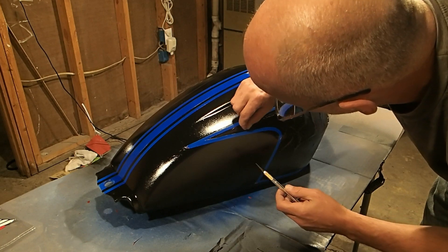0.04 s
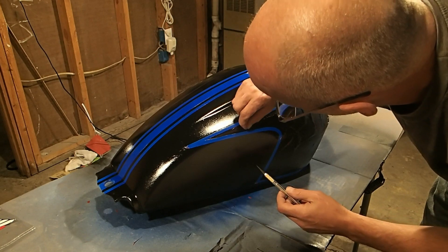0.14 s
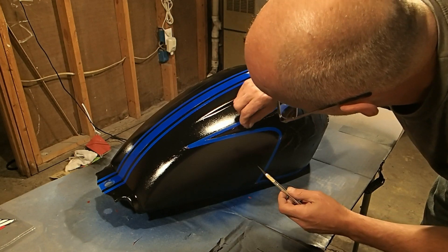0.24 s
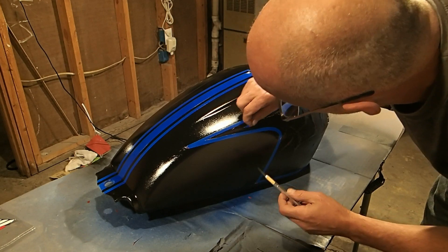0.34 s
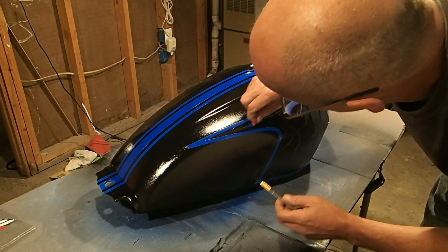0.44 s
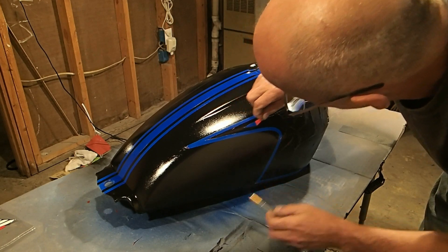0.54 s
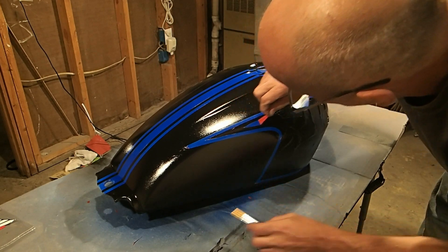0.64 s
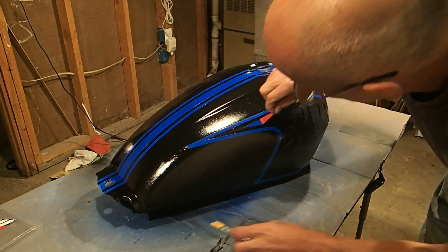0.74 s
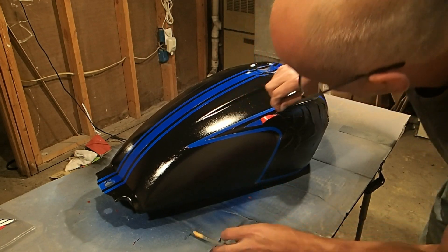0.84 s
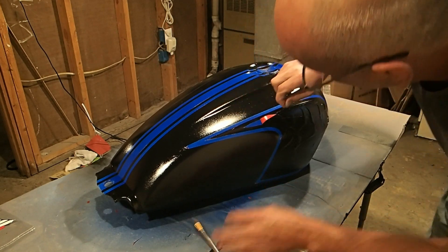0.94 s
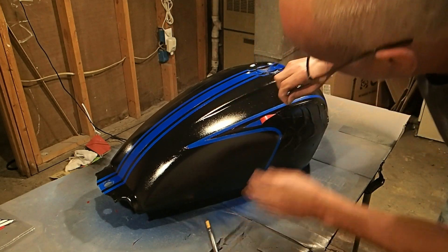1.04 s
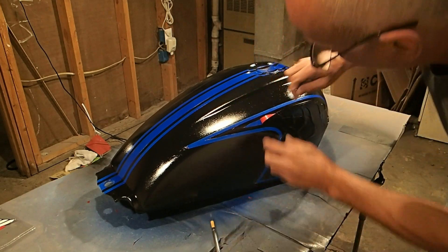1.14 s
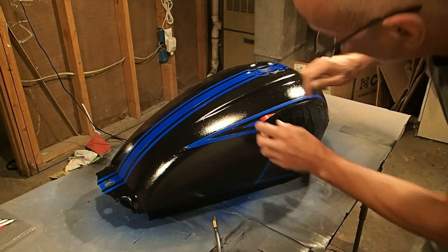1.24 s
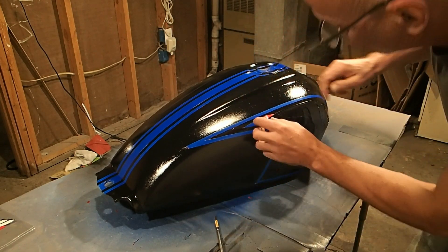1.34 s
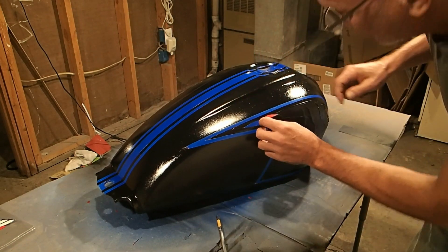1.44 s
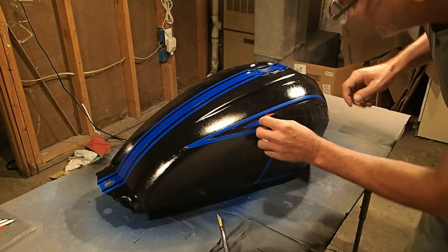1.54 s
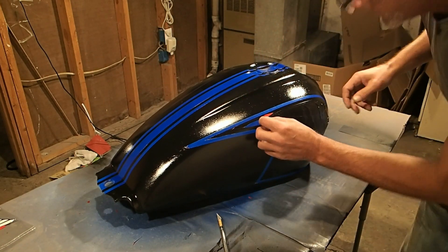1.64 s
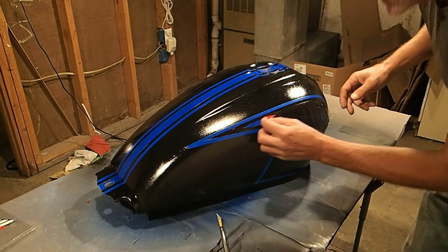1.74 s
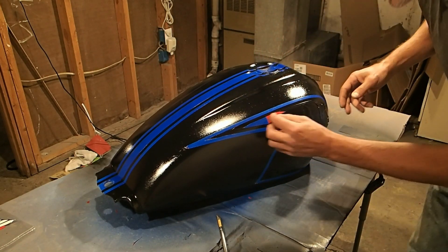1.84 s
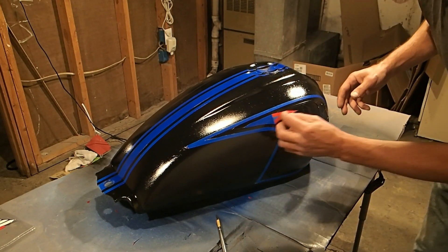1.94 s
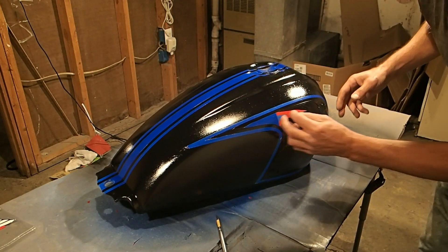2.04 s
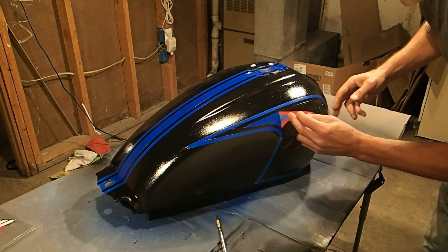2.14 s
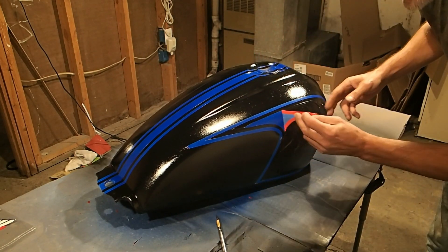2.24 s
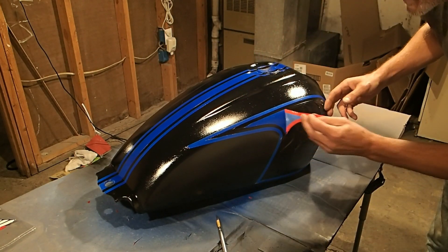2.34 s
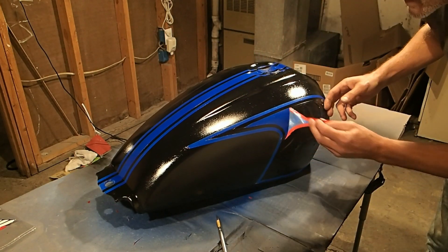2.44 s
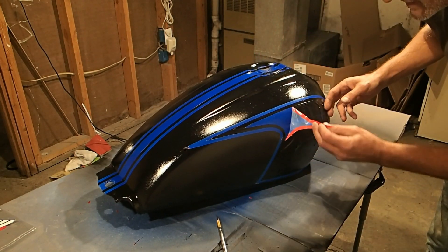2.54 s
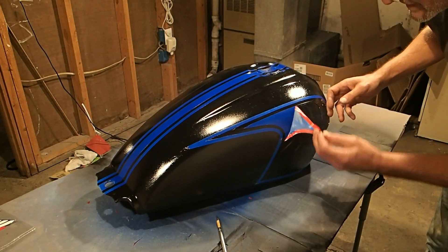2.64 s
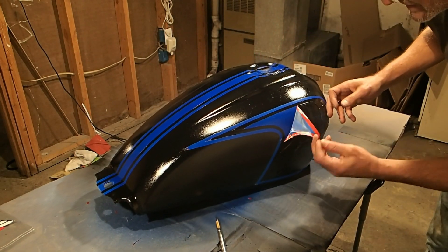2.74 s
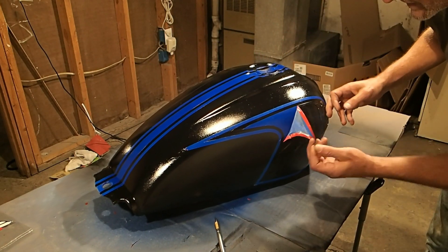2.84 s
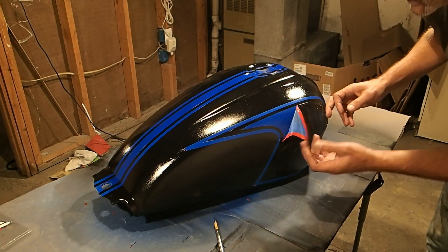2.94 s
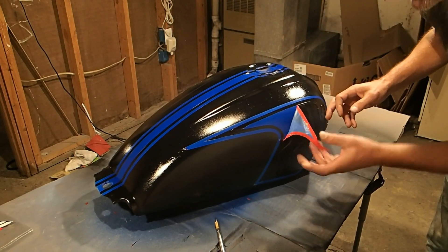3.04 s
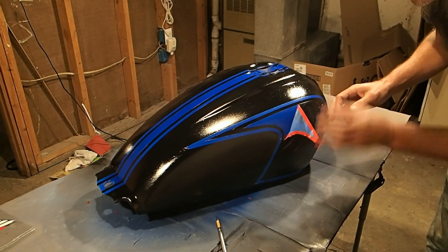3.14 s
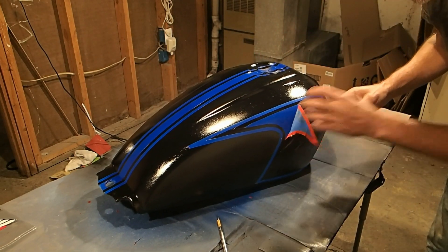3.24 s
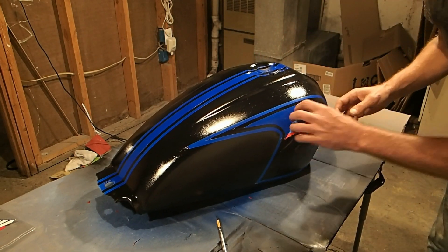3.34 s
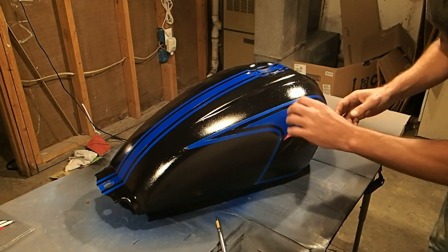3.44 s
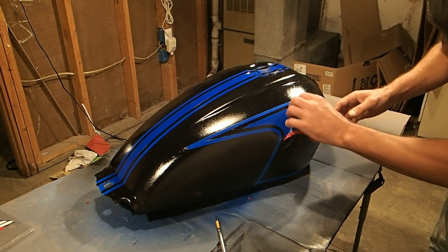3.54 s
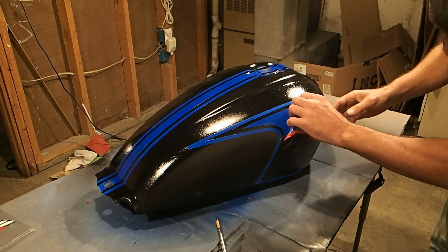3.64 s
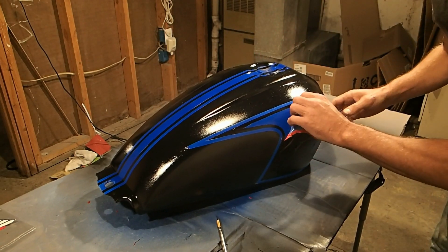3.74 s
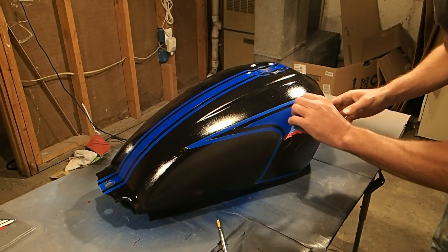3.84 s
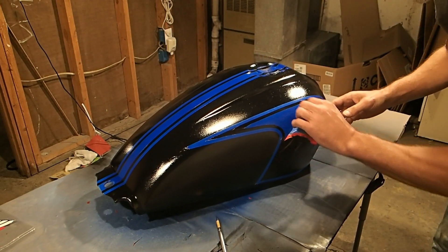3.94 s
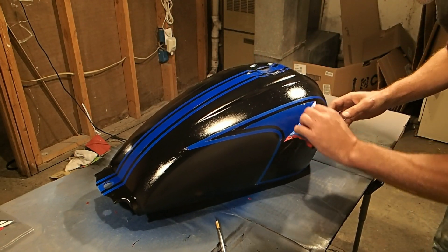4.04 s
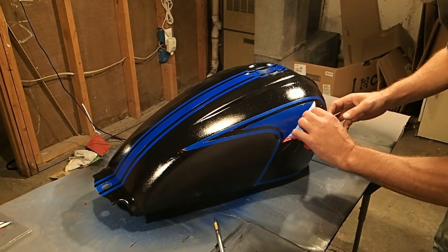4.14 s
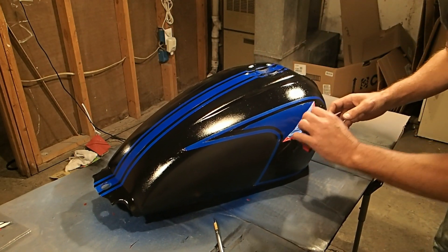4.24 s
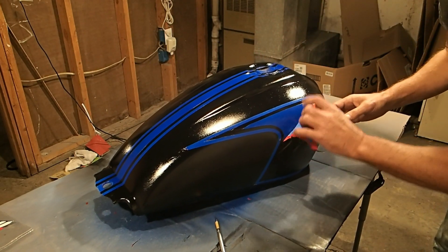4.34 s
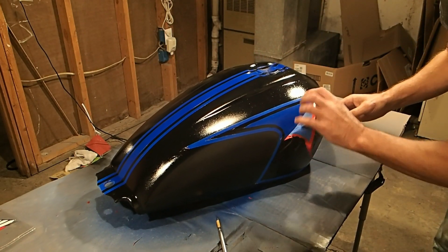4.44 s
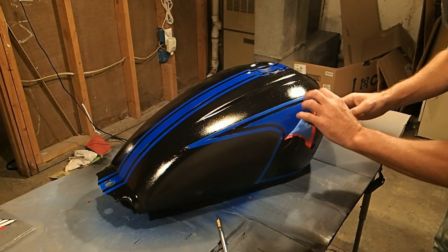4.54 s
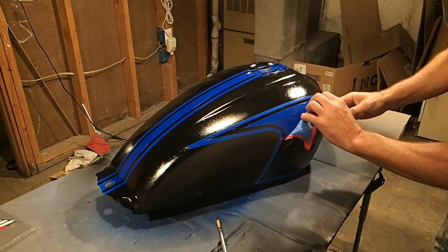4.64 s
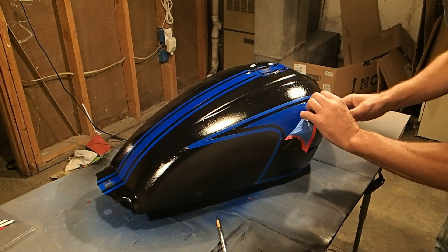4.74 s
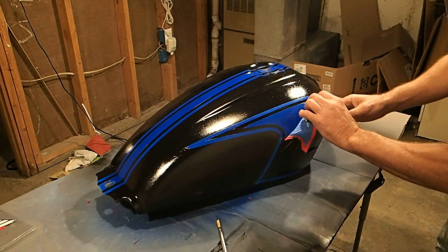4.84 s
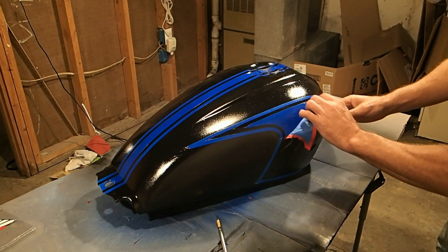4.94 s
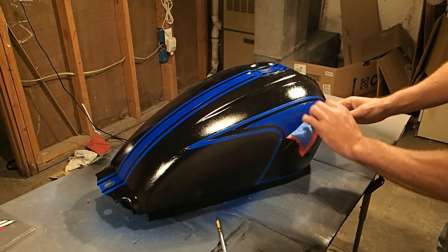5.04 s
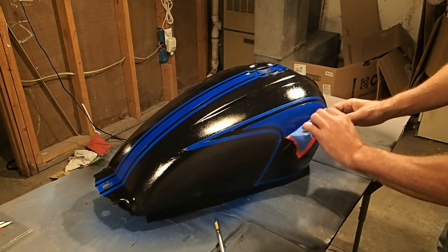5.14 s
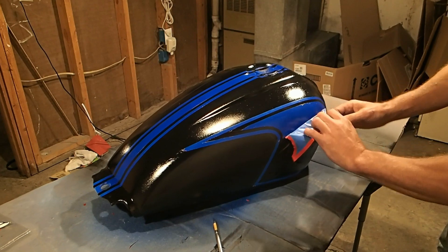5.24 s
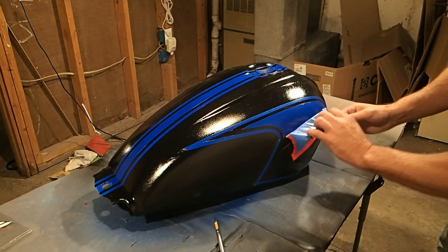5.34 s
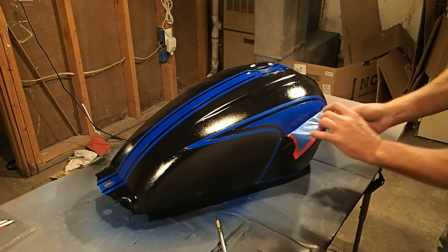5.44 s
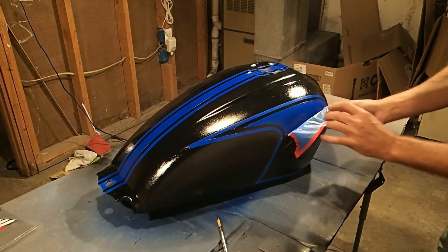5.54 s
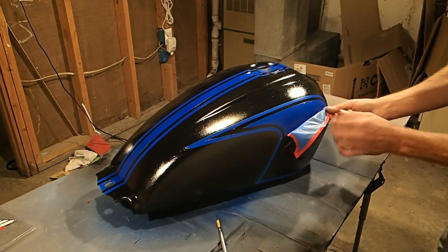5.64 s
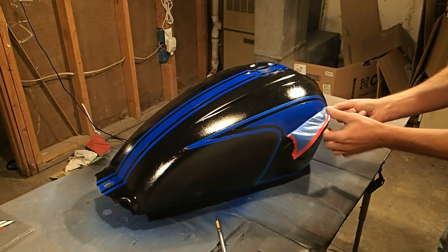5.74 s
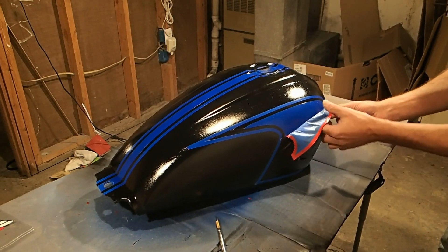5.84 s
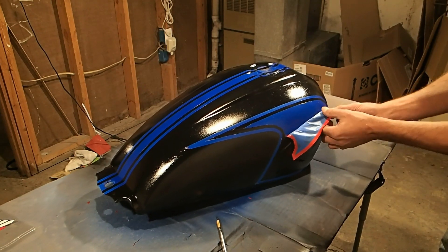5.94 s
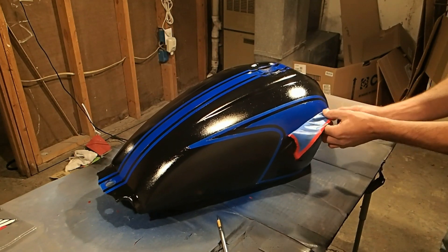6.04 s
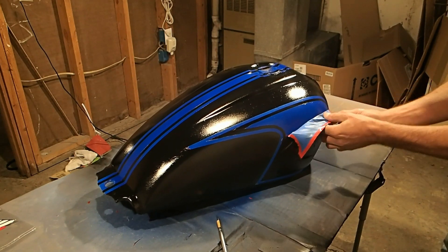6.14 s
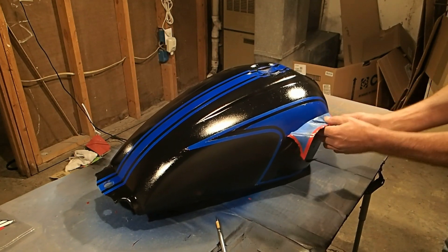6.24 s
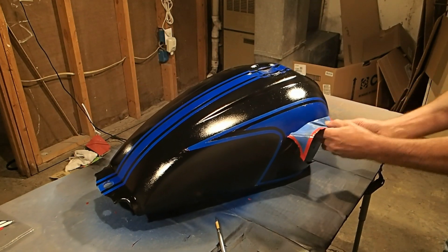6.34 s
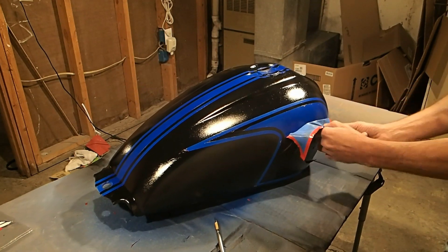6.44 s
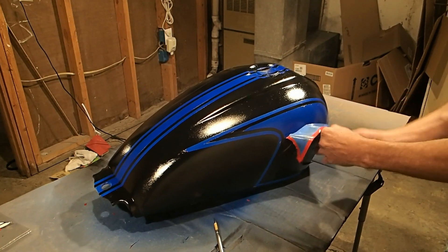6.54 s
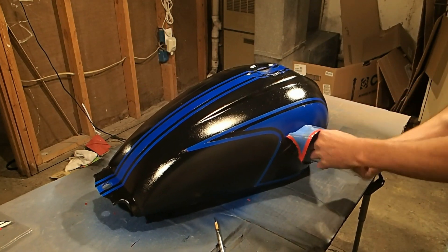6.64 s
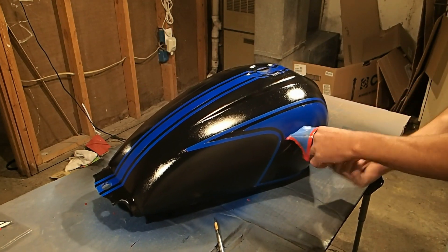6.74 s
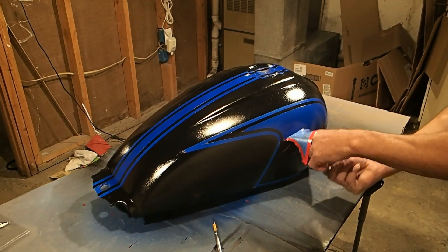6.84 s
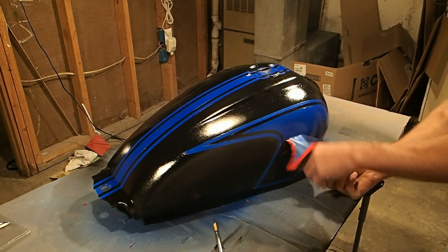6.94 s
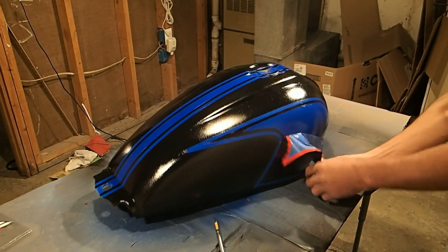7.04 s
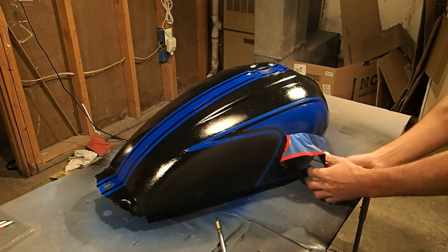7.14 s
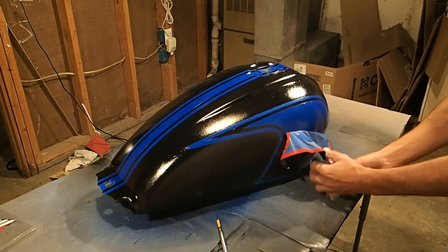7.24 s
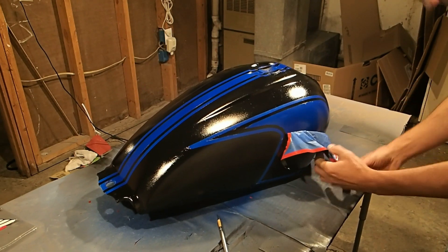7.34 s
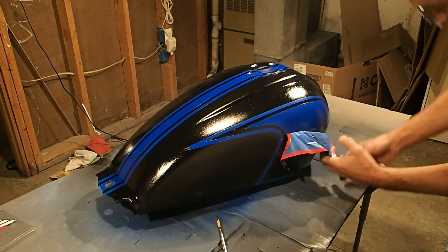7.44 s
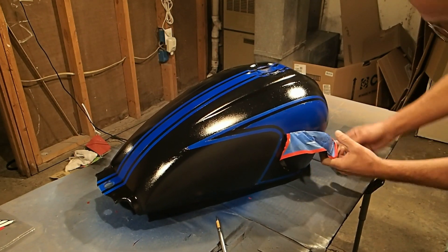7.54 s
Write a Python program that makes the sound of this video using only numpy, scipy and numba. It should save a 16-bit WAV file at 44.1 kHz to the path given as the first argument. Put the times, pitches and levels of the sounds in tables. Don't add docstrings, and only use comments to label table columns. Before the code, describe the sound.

Close, bright tape peeling in a small workshop: sticky crackle, hard snaps, two long rips, soft hand bumps, low hum behind.

```python
import sys
import numpy as np
from scipy import signal
from scipy.fft import rfft, irfft
from scipy.io import wavfile
from scipy.ndimage import uniform_filter1d
from numba import njit

SR = 44100
rng = np.random.default_rng(int(sys.argv[2]) if len(sys.argv) > 2 else 0)


def digitize_waveform(pressure):
    field = np.atleast_2d(pressure).T
    bounded = np.clip(field, -1, 1)
    quanta = np.round(bounded * 32767).astype(np.int16)
    wavfile.write(sys.argv[1], SR, quanta)


def boost(x):
    u = np.asarray(x, float) / 20
    return 10 ** u


N = 335477
TIME = np.arange(N) / SR
GAIN_TOP_DB, GAIN_RATIO = -25, 2.0


def unit(x):
    return x / np.sqrt(np.mean(x ** 2))


def colour(x, points):
    hz, db = np.transpose(points)
    log_hz = np.log(np.fft.rfftfreq(4096, 1 / SR) + 1)
    cepstrum = irfft(np.interp(log_hz, np.log(hz), db) * np.log(10) / 20)
    cepstrum[1:2048] *= 2
    cepstrum[2049:] = 0
    impulse = irfft(np.exp(rfft(cepstrum)))
    return signal.fftconvolve(x, impulse)[:len(x)]


def band(x, lo_hz, hi_hz, order=2):
    edges_hz = [lo_hz, min(hi_hz, .45 * SR)]
    return signal.sosfilt(signal.butter(order, edges_hz, "band", fs=SR, output="sos"), x)


@njit
def ring(x, hz, width_hz):
    y, b, l = np.empty(len(x)), 0., 0.
    for i in range(len(x)):
        g, k = np.tan(np.pi * hz[i] / SR), width_hz / hz[i]
        v = (b + g * (x[i] - l)) / (1 + g * (g + k))
        b, l = 2 * v - b, l + 2 * g * v
        y[i] = k * v
    return y


def ring_at(x, hz, width_hz):
    return ring(x, np.full(len(x), 1. * hz), 1. * width_hz)


def body(x, modes):
    return sum((-1) ** k * boost(db) * ring_at(x, hz, width_hz) for k, (hz, width_hz, db) in enumerate(modes))


def add(track, s, sound):
    i = int(s * SR)
    track[i:i + len(sound)] += sound[:len(track) - i]


# f/Hz, level/dB
PORT = [(20, 12), (200, 2.5), (3300, 6), (3800, 6.5), (4050, -2.5), (4300, 7.5), (5200, 20), (6000, 14),
        (7000, 8), (10500, 7), (13000, 0.5), (15600, -16), (15900, -17), (17500, -27)]


def port(x):
    return colour(x, PORT)


def heard(x):
    return x / np.std(port(x))


@njit
def follow(x, attack, release):
    y, e = np.empty(len(x)), 1e-4
    for i in range(len(x)):
        e += (x[i] - e) * (attack if x[i] > e else release)
        y[i] = e
    return y


def at_source(db):
    return db + (GAIN_RATIO - 1) * np.maximum(db - GAIN_TOP_DB, 0)


# f/Hz, density/dB per Hz
HUM = [(30, -20), (60, -12.5), (120, 2.5), (300, 5.5), (600, 2), (1200, -6), (3000, -13.5), (6000, -25.5),
       (15500, -23.5)]


def hum():
    hum_db, mains_db, mains_hz = -47.5, -64, 119.7
    mid, side = (unit(colour(rng.standard_normal(N), HUM)) * boost(hum_db) for _ in range(2))
    mid = mid + boost(mains_db) * np.sin(2 * np.pi * mains_hz * TIME)
    return mid, colour(side, [(50, -1.0), (200, -9.5), (2000, -9.0), (10000, -4.0)])


# t/s, f/Hz, level/dB, t60/s
PINGS = [
    (6.026, 1023, -41, 0.4),
    (6.03, 392, -35, 0.46),
    (6.06, 1093, -38, 1.0),
    (2.06, 400, -40, .8),
    (2.18, 330, -42, .6),
    (7.35, 820, -36, .15),
    (6.187, 588, -36, 0.8),
]


def pings():
    out, t = np.zeros(N), TIME[:SR // 2]
    fade_out = np.hanning(SR)[SR // 2:]
    for s, hz, db, t60 in PINGS:
        add(out, s, boost(db - 60 * t / t60) * np.sin(2 * np.pi * hz * t) * fade_out)
    return out


# f/Hz, width/Hz, level/dB
TABLE = [(73.4, 5.3, 3), (147, 15.3, 6), (194.6, 18, 4.5), (298, 116, -1.5), (695, 350, -5),
         (1140, 250, -10)]
# t/s, peak level/dB, f/Hz, share of table boom/0-1
KNOCKS = [(.70, -20, 490, 0.28), (.831, -9, 890, 0.4), (.836, -12, 378, 0.47), (0.8795, -8, 900, 0.3),
          (0.885, -15, 400, 0.5), (1.004, -23, 754, .4), (1.124, -23, 700, 0.14), (4.504, -9, 600, 0.15),
          (5.197, -20, 700, 0.02), (5.383, -19.5, 510, 0.25), (5.499, -10, 576, 0.15),
          (5.515, -14, 800, 0.1), (5.535, -18, 600, 0.2), (4.535, -22, 800, .1), (6.061, -29, 1020, .7),
          (6.149, -23, 1110, 0.7), (6.34, -23, 200, 0.83), (6.828, -17, 740, 0), (6.96, -21, 950, 0.3),
          (6.878, -22, 560, 0.6), (6.93, -17, 1020, 0.52), (7.056, -22.5, 294, 1),
          (7.074, -19.5, 560, 0.44), (7.088, -21, 200, 0.7), (7.126, -19.5, 545, 0.35),
          (7.135, -18, 1110, 0.35), (7.155, -20, 400, 0.6), (7.276, -25, 570, .16), (7.3, -25, 450, .1),
          (7.318, -24, 1100, .1), (7.347, -17, 820, 0)]


def knocks():
    knife_end_s = 1.5
    out, push, t = np.zeros(N), np.zeros(6000), TIME[:6000]
    push[:30] = np.hanning(30)
    table = body(push, TABLE)
    for (s, db, hz, boom), noise in zip(KNOCKS, rng.standard_normal((len(KNOCKS), len(t)))):
        rub_s, hardness = (0.0036, 0.69) if s < knife_end_s else (0.0087, 0.22)
        rub = band(noise * np.exp(-t / rub_s) * np.minimum(t / (0.34 * rub_s), 1), 250, 1460)
        tap = ring_at(push, hz, hz / 2)
        note = ring_at(rub, hz, hz * .6) + .3 * rub
        top = hardness * tap / np.abs(tap).max() + 0.64 * note / np.abs(note).max()
        boom = np.clip(boom, 0, 1)
        knock = boom * table / np.abs(table).max() + (1 - boom) * top
        add(out, s + 0.002, boost(db - 0.5) * knock)
    return out


# t/s, peak level/dB, f/Hz, length/s
POPS = [(5.271, -20, 2460, 0.0029), (5.5, -11, 2600, 0.0026), (5.7348, -11, 2400, 0.0026),
        (5.740, -11.5, 2100, 0.0027), (5.782, -18, 2830, 0.0033), (5.8365, -24, 2210, 0.0035),
        (5.895, -27, 3160, 0.0033), (4.911, -5, 3100, 0.0053), (4.928, -21, 2700, .005),
        (4.971, -10, 2200, 0.0074), (5.039, -15, 3400, 0.0088), (6.94, -10.5, 2200, .006),
        (7.16, -15, 2300, 0.011), (7.28, -17.5, 1440, 0.0043), (1.011, -28, 2870, 0.0053),
        (4.37, -19, 1800, .006), (4.27, -36, 4800, .004)]


def pops():
    out, t = np.zeros(N), TIME[:1800]
    for (s, db, hz, length_s), noise in zip(POPS, rng.standard_normal((len(POPS), len(t)))):
        puff = noise * np.minimum(t / 0.00035, 1) * np.exp(-t / length_s)
        pop = ring_at(ring_at(puff, hz, 1300), hz, 1500)
        add(out, s, boost(db - 6.5) * pop / np.abs(pop).max())
    return out


# t/s, peak level/dB
THREADS = [(0.2803, -31), (0.314, -23), (0.3626, -28), (0.375, -23), (0.3866, -17), (0.418, -19),
           (0.5133, -25), (0.525, -20), (0.541, -11), (0.5657, -10), (0.615, -13), (0.628, -13),
           (0.639, -19), (0.6839, -13), (0.746, -15), (0.8824, -9.5), (0.889, -17), (1.6743, -30),
           (1.7315, -8), (1.7636, -11), (1.8405, -14), (1.9765, -11), (2.0036, -14), (5.335, -32),
           (5.39, -18), (5.506, -8), (5.9415, -33), (5.946, -32)]


def threads():
    out, t = np.zeros(N), TIME[:1800]
    decay = np.exp(-t / 0.00039) + 0.13 * np.exp(-t / 0.0065)
    for (s, db), noise in zip(THREADS, rng.standard_normal((len(THREADS), len(t)))):
        tick = band(noise * decay, 7300, 17000)
        add(out, s, boost(db - 3.5) * tick / np.abs(tick).max())
    return out


# t/s, peak level/dB, tape ring
# f/Hz
SNAPS = [(0.567, -15, 1290), (0.658, -10.5, 1270), (0.7464, -16, 2410), (1.0077, -19, 1140),
         (1.188, -24.5, 1790), (1.7344, -9, 2580), (2.0314, -8, 1850), (2.0834, -26, 1570),
         (2.1827, -1, 3270), (2.189, -10, 2280), (2.2119, -13, 2250), (2.2368, -8, 2070), (2.311, -3, 2310),
         (2.3359, -3.5, 3950), (2.4111, -4.5, 1960), (2.488, -9.5, 2420), (2.495, -6.5, 2120),
         (2.514, -12, 2200), (2.5644, -8.5, 1370), (2.5908, -8, 2820), (2.6043, -16, 3510),
         (2.61, -6, 3580), (2.6165, -4.5, 3570), (2.632, -14, 2410), (2.6415, -3, 1940), (2.677, -2, 1980),
         (2.765, -1, 3700), (2.7709, 1, 3950), (2.775, -11, 3100), (2.8515, -10.5, 3550),
         (2.951, -16, 3840), (2.9574, -28, 1140), (3.6111, -30, 2000), (3.67, -41, 2000), (3.782, -2, 3400),
         (3.8044, -10, 2660), (3.8214, -5.5, 2800), (3.8344, -9, 2710), (3.8565, -9, 2990),
         (3.864, -11, 3000), (3.8725, -11, 2800), (3.9005, -9, 2130), (3.9104, -3.5, 2300),
         (3.9225, 0, 2030), (3.9367, 5, 2560), (3.9465, -5, 1750), (3.9541, 7, 1510), (3.9639, 1.5, 1440),
         (3.992, -1.5, 2400), (4.0151, 1, 1320), (4.2861, -20, 3790), (4.2976, -14, 2600),
         (4.3665, -15, 3600), (4.445, -2, 9700), (4.4513, -6, 9500), (4.8594, 2.5, 3730),
         (4.8828, -7, 3840), (4.9047, -3.5, 3400), (4.9262, -6, 2560),
         (4.9432, 0.5, 2390), (4.9664, 1, 2370), (4.979, -5.5, 2370), (4.991, -4, 3530),
              (5.0086, -7, 3540), (5.0231, -8, 2130), (5.0395, -10, 3490), (5.1052, -10, 2820),
              (5.11, -13, 2980), (5.3732, -8.5, 2840), (5.3773, -9, 3230), (5.3948, -21, 2600),
              (5.502, -5, 2600), (5.5058, -1, 3320), (5.7353, -20, 2580), (5.7401, -22, 2540),
              (5.833, -25, 2330), (5.8945, -40, 3450), (5.9815, -19, 3650), (5.986, -20, 3580),
              (6.0254, -17, 3700), (6.0887, -15, 3620), (6.094, -24, 3500), (6.1158, -17, 3320),
              (6.1828, -10, 3700), (6.1869, -11, 3520), (6.1976, -15, 3630), (6.203, -13, 3360),
              (6.2238, -14, 3500), (6.2713, -7, 2190), (6.2766, -10, 1600), (6.2826, -21, 2110),
              (6.2997, -10, 2200), (6.434, -17, 1570), (6.4421, -11, 2600), (6.4807, -9, 2600),
              (6.5617, -2.5, 3400), (6.6407, -14, 3700), (6.6534, -9, 2730), (6.67, -14, 3450),
              (6.675, -11, 3520), (6.706, -11, 2630), (6.7093, -6.5, 3640), (6.7716, -5, 2650),
              (6.8494, -7, 3340), (6.9426, -15, 2630), (6.9675, -15, 2300), (7, -26, 2400),
              (7.1642, -4.5, 2500), (7.179, -26, 2300), (7.2161, -6.5, 1900), (7.2207, -14, 1850),
              (7.2276, -8, 2560), (7.342, -27, 1120), (7.3478, -20, 1120), (7.3554, -29, 1890),
              (7.4638, -21.5, 1130), (7.5785, -26.5, 3340)]


def snaps(lift_db):
    snap_db, ring_width_hz, ring_gain = 4, 770, 2.16
    after_db, after_s = -22.5, 0.0061
    out, t, rows = np.zeros(N), TIME[:1500], SNAPS
    tears = rng.standard_normal((len(rows), len(t)))
    for (s, db, hz), noise in zip(rows, tears):
        click = .12 * noise * (t / .0004) * np.exp(1 - t / .0004)
        click += boost(after_db) * noise * np.exp(-t / after_s) * (t > .0007)
        click[30] += 1
        tape = ring_at(click, hz, ring_width_hz)
        crack = band(click, 1100, 4.5 * hz, order=1)
        crack = band(crack, .6 * hz, 16000, order=1) + ring_gain * tape
        crack /= np.abs(port(crack)).max()
        lift = lift_db[int((s - .002) * SR)]
        add(out, s - .0009, boost(db + snap_db + lift) * crack)
    return out


def slips(rate_hz, scatter_db):
    when, size = rng.random(N), np.minimum(rng.exponential(size=N), 3.5)
    starts = (when < rate_hz / SR) * boost(scatter_db * size)
    return signal.lfilter([1], [1, -np.exp(-1 / (0.0012 * SR))], starts) * rng.standard_normal(N)


# f/Hz, width/Hz, level/dB
TANK_FRONT = [(296, 20, -5), (497.5, 10, 1.5), (640, 28, -10.5), (831, 9.1, 1), (1028, 6.2, 4),
              (1140, 14, -9), (1390, 20, 7.5), (1650, 8.9, 4), (1750, 11, -2.5), (2130, 20, -9),
              (2300, 68, -14.5), (2560, 38, -11), (2852, 42, -13.5), (3400, 17, -9)]
# f/Hz, width/Hz, level/dB
TANK_MIDDLE = [(305, 25, -11), (400, 22, -3.5), (559, 58, -3.5), (753, 43, -1.5), (1007, 39, 5.5),
               (1220, 82, -3), (1436, 22, 7.5), (1600, 52, 0.5), (1745, 25, -7), (2000, 23, 2.5),
               (2203, 24, -8.5), (2540, 18, 2.5), (2820, 55, -10)]
# f/Hz, width/Hz, level/dB
TANK_REAR = [(350, 190, 0.5), (541, 36, 10), (780, 140, 4.5), (1020, 33, 10.5), (1730, 5.8, -60)]


def tank(x):
    middle_s, rear_s = 1.6, 4.6
    front, middle, rear = (heard(body(x, modes)) for modes in (TANK_FRONT, TANK_MIDDLE, TANK_REAR))
    shell = np.where(TIME < middle_s, front, np.where(TIME < rear_s, middle, rear))
    dense_modes = heard(band(x, 205, 910))
    return shell + np.where(TIME < middle_s, .16, .29) * dense_modes


# t/s, hold/s, crackle level/dB, fade/dB per s, tape ring f/Hz
TUGS = [(1.007, 0.0023, -40, 150, 2530), (2.183, 0.0065, -19, 42, 2000), (2.309, 0.0049, -21.5, 52.5, 1930),
        (2.588, 0.015, -20.5, 132, 2400), (2.766, 0.0099, -21, 145, 2950), (2.945, 0.022, -34.5, 389, 3240),
        (4.447, 0.0064, -19.5, 400, 2200), (5.37, 0.0055, -25.5, 400, 2780),
        (5.387, 0.0091, -18.5, 269, 2770), (4.357, 0.012, -29, 204, 2520), (5.502, 0.0018, -28, 494, 2630),
        (5.737, 0.0013, -29, 354, 2300), (5.783, 0.0084, -34.5, 300, 2800), (5.985, 0.0037, -38, 800, 3000),
        (6.022, 0.0017, -16, 200, 3500), (6.044, .004, -24, 200, 3000), (6.427, .003, -37, 298, 1600),
        (6.087, .004, -18, 250, 3340), (6.109, 0.0036, -23, 177, 3280), (6.184, 0.03, -17.5, 400, 2850),
        (6.216, 0.061, -19, 250, 2300), (6.27, 0.04, -24.5, 140, 1900), (6.438, 0.11, -16.5, 205, 3470),
        (7.167, 0.062, -26, 145, 2200)]
# t/s, crackle level/dB, tape ring f/Hz
DRAGS = [
    [(0.306, -40, 1880), (0.314, -36.5, 1750), (0.441, -22, 1600), (0.527, -26, 1450), (0.583, -20.5, 1520),
     (0.74, -25, 1600), (0.75, -24.5, 1600), (0.813, -31, 1600), (0.865, -24.5, 1460), (0.98, -53, 1440)],
    [(1.09, -61, 1720), (1.104, -52, 1490), (1.138, -36.5, 1560), (1.17, -38, 2150), (1.196, -36, 2220),
     (1.252, -43, 2020), (1.346, -28.5, 2560), (1.418, -29, 2630), (1.52, -52, 2080)],
    [(1.66, -43, 1980), (1.68, -35, 2240), (1.728, -24.5, 2040), (1.734, -18.5, 1720), (1.814, -17.5, 1620),
     (1.886, -18, 2060), (2.098, -21.5, 1790), (2.17, -31.5, 1860)],
    [(6.59, -22, 2470), (6.62, -24.5, 2580), (6.63, -18, 2620), (6.701, -25, 2600), (6.706, -18.5, 2720),
     (6.83, -25.5, 2540), (6.862, -25, 2670), (6.976, -21.5, 2430), (7.05, -58, 2220)],
]
# t/s, crackle level/dB, tape ring f/Hz
FURTHER_DRAGS = [
    [(3.5, -58, 2110), (3.624, -60, 2050), (3.634, -63, 1800), (3.758, -66, 2100), (3.77, -64, 1960)],
    [(4.15, -62, 1690), (4.248, -40, 2140), (4.258, -58, 2670), (4.294, -21, 2700), (4.43, -54, 2050)],
    [(4.5, -24.5, 1560), (4.738, -83, 2040), (4.754, -44, 2100), (4.792, -71, 2180), (4.8, -40, 2140)],
    [(5.17, -34, 2690), (5.232, -28.5, 1910), (5.26, -45, 2560), (5.342, -39, 2350), (5.36, -53, 2270)],
    [(5.82, -53, 2320), (5.832, -55, 2280), (5.876, -74, 2230), (5.894, -44, 2310), (5.97, -54, 2030)],
    [(7.05, -19.5, 1630), (7.058, -41, 1580), (7.076, -26, 1580), (7.112, -38, 1510), (7.155, -31, 1450)],
    [(7.28, -24.5, 1410), (7.338, -46, 1950), (7.348, -20.5, 2100), (7.382, -45, 1960), (7.6, -48.5, 2030)],
]
# t/s, crackle level/dB, tape ring f/Hz, flap level/dB
RIPS = [
    [(3.779, -44, 3100, -7), (3.782, -19.5, 3030, -3), (3.85, -18.5, 2870, -9), (3.915, -19.5, 2720, -9),
     (3.93, -23.5, 1970, -5), (3.975, -18, 1350, -8.5), (4.02, -22.5, 1290, -8), (4.04, -28.5, 1300, -3),
     (4.2, -54, 1290, 13.5)],
    [(4.857, -26.5, 3600, -11), (4.86, -25, 3570, -1), (4.895, -20, 3500, -12), (4.91, -26.5, 3280, 7.5),
     (4.97, -24, 2150, 4), (5.03, -22, 2080, 3), (5.043, -19, 3520, 2.5), (5.12, -22, 3000, 0.5),
     (5.25, -43, 2800, 14)],
]


def pulls():
    attack_s, cut_db, sag_oct_per_s = .0015, 45, 3.5
    flap_share, flap_late_db = 0.41, -1.5
    parts = []
    for s, hold_s, db, fade, hz in TUGS:
        t = TIME - s
        faded_db = fade * np.maximum(t - hold_s, 0)
        attack = np.clip(t / attack_s + 1, 0, 1)
        power = boost(db - faded_db) ** 2 * attack ** 2 * (faded_db < cut_db)
        late = np.maximum(t, 0)
        sagging_hz = hz * 2 ** (-sag_oct_per_s * np.minimum(late, hold_s))
        parts.append((power, sagging_hz, flap_late_db * np.exp(-late / (flap_share * hold_s))))
    for drag in DRAGS + FURTHER_DRAGS:
        s, db, hz = np.transpose(drag)
        power = boost(np.interp(TIME, s, db, -120, -120)) ** 2
        parts.append((power, np.interp(TIME, s, hz), 0))
    for rip in RIPS:
        s, db, hz, flap_db = np.transpose(rip)
        power = boost(np.interp(TIME, s, db, -120, -120)) ** 2
        parts.append((power, np.interp(TIME, s, hz), np.interp(TIME, s, flap_db)))
    total = sum(power for power, _, _ in parts) + 1e-12
    tape_hz, lag_db = (sum(part[0] * part[k] for part in parts) / total for k in (1, 2))
    return 10 * np.log10(total), np.clip(tape_hz, 900, 4000), lag_db


# t/s, steel coupling level/dB, loose flap level/dB
FRONT = [(.3, 9.5, 9), (.8, 11, 10), (1.2, 1, 2.5), (1.801, 1.5, 6.5), (2.2, -4.5, 2.5), (2.6, 3, 4.5),
         (3.0, 5, -1), (3.799, 4.5, 10), (4.05, 12, 14), (4.4, -4.5, -1), (4.9, -1.5, 7), (5.3, -18.5, -16),
         (5.6, 11, 18.5), (6.05, -8.5, 0), (6.3, -3.5, 2.5), (6.6, -6, -2), (7.0, -5, 3), (7.4, -19, 6.5)]
# t/s, level/dB
FIZZ = [(.3, 2.5), (.45, 4), (.5, 3.5), (.55, 7.5), (.66, 5), (.72, 0), (.8, 2), (.88, -1.5), (2.5, 3),
        (4.2, 0), (4.45, 0), (4.8, -3), (5.4, -2.5), (5.55, 16.5), (5.72, 2), (5.95, -7), (6.1, 1.5),
        (7.4, -0.5)]


def peel():
    tape_width_hz, tape_ring, rip_ring = 620, 0.67, 0.9
    fizz_db, shake_db = -4.5, -22.5
    pull_db, tape_hz, lag_db = pulls()
    s, steel_db, flap_db = np.transpose(FRONT)
    tank_db = np.interp(TIME, s, steel_db) + lag_db
    tape_db = np.interp(TIME, s, flap_db) + lag_db

    x = slips(rate_hz=1600, scatter_db=1.0)
    fine = slips(rate_hz=1500, scatter_db=4.5)
    shell = tank(x)
    crackle = heard(band(x, 3100, 7200))
    ripping = sum((TIME > rip[0][0]) & (TIME < rip[-1][0]) for rip in RIPS)
    lifted = np.where(ripping, rip_ring, tape_ring)
    strip = ring(ring(x, tape_hz, tape_width_hz), tape_hz, tape_width_hz)
    sheet = heard(band(x, 1000, 4440) + lifted * strip)
    steel = np.interp(TIME, [.85, 1.1, 7.6], [1.15, .6, .2])
    tape = sheet + steel * band(shell, 1277, 3340)
    fizz = heard(band(x + .8 * fine, 7000, 16000))
    shake = heard(body(x, TABLE[:2])) * np.interp(TIME, [.45, .65, 1.9, 2.05], [0.47, 0.91, 0.27, 0.16])

    mix = crackle + boost(tape_db - 4.5) * tape
    mix = mix + boost(fizz_db + np.interp(TIME, *np.transpose(FIZZ))) * fizz
    mix = mix + boost(tank_db - 6.0) * band(shell, 263, 1280) + boost(shake_db) * shake
    effort_db = at_source(pull_db)
    lift_db = effort_db - pull_db
    return boost(effort_db - 2.0) * mix + snaps(lift_db) + boost(lift_db) * (pops() + threads())


# f/Hz, t60/s
ROOM = [(200, 0.34), (500, 0.37), (1200, 0.29), (2800, 0.32), (6000, 0.21), (12000, 0.093)]
# f/Hz, level/dB
WIDTH = [(100, -11), (500, -18), (2000, -18), (5000, -12), (10000, -4)]


def room(x):
    echo_s, echo_db, room_db = .0045, -13, -5
    t = TIME[:SR * 2 // 3]
    tails = np.zeros((2, 2, len(t)))
    for hz, t60 in ROOM:
        tails += band(rng.standard_normal(tails.shape), hz / 1.67, hz * 1.463) * boost(-60 * t / t60)
    tails[0] *= np.clip((t - echo_s) / 0.00056, 0, 1)
    tails[1] *= 1 + 1.94 * np.exp(-t / 0.0021)
    tails *= boost(room_db) / np.sqrt(np.sum(tails[0, 0] ** 2))
    place = 2 * np.pi * .6 * TIME
    moved = x * np.array([np.cos(place), np.sin(place)])
    mid, side = (signal.oaconvolve(moved, tail, axes=1)[:, :N].sum(axis=0) for tail in tails)
    echo = np.roll(x, int(echo_s * SR)) * boost(echo_db)
    return x + echo + mid, colour(side, WIDTH)


def scene():
    left_db = -2
    mid, side = np.add(room(peel() + knocks() + pings()), hum())
    return np.array([(mid + side) * boost(left_db / 2), (mid - side) * boost(-left_db / 2)])


def low_pass(x):
    return signal.sosfilt(signal.butter(12, 16650, fs=SR, output="sos"), x)


def record(dry):
    attack_s, release_s, hiss_db, top_hz = .0015, 0.069, -64.5, 15900
    wet = np.array([port(channel) for channel in dry])
    level = uniform_filter1d(np.abs(wet).mean(axis=0), size=64)
    loud = follow(level, 1 / (attack_s * SR), 1 / (release_s * SR))
    wet = wet * np.minimum(boost(GAIN_TOP_DB) / loud, 1) ** (1 - 1 / max(GAIN_RATIO, 1))
    wet = wet + boost(hiss_db) * signal.lfilter([1, -2, 1], [1], rng.standard_normal(wet.shape))
    wet = signal.sosfilt(signal.ellip(8, .2, 35, top_hz, fs=SR, output="sos"), wet)
    return low_pass(np.clip(wet, -1, 1))


dry = scene()
out = record(dry)
digitize_waveform(out)
```